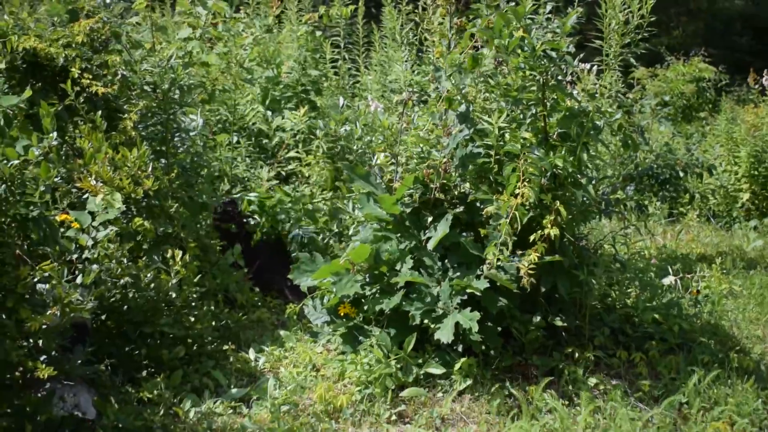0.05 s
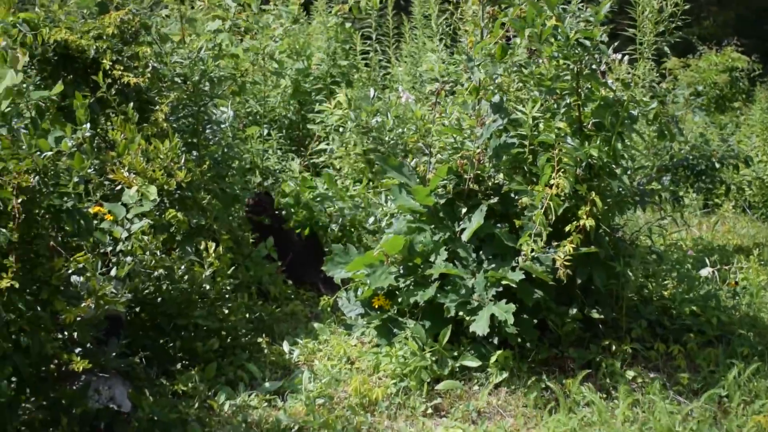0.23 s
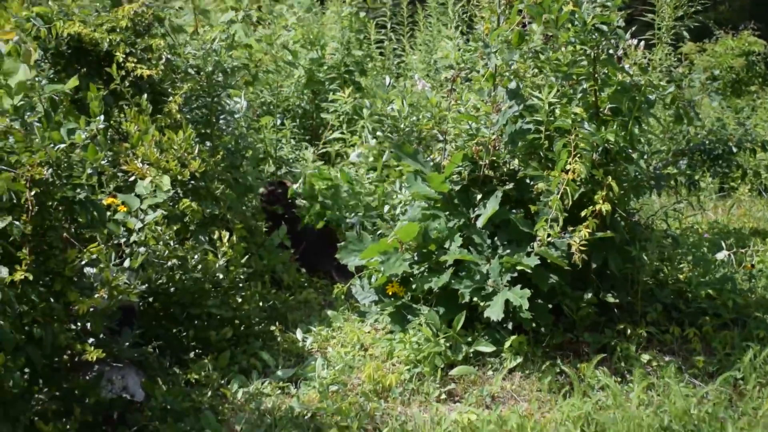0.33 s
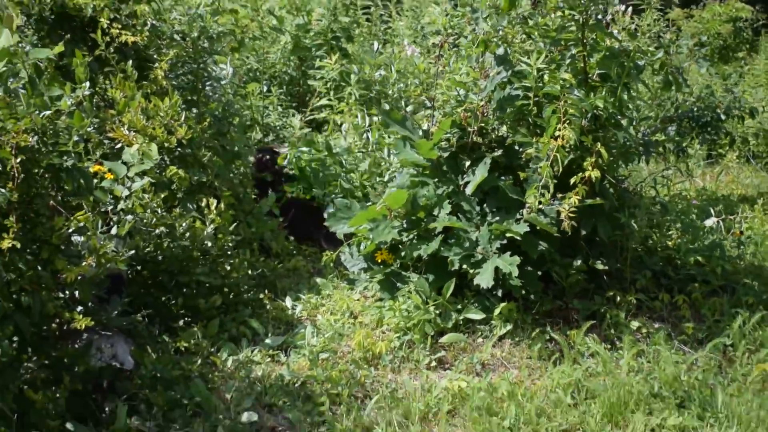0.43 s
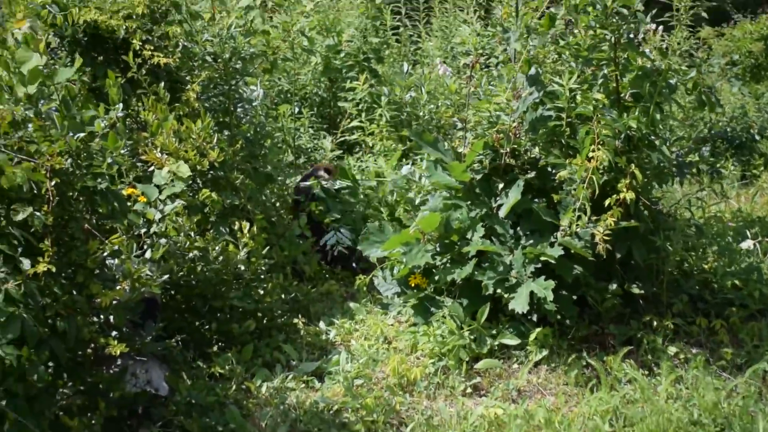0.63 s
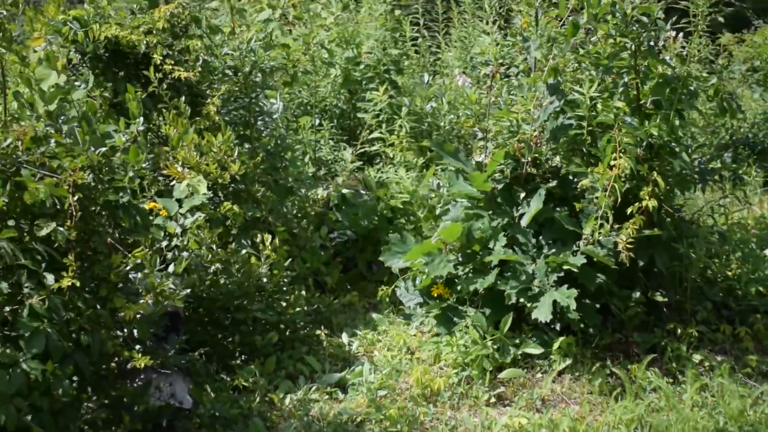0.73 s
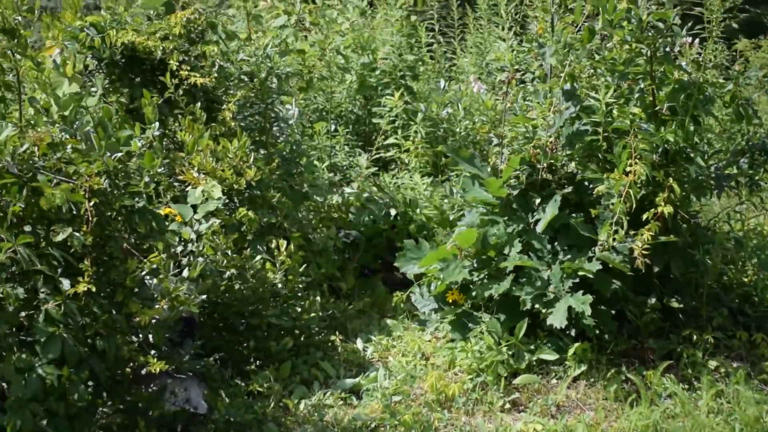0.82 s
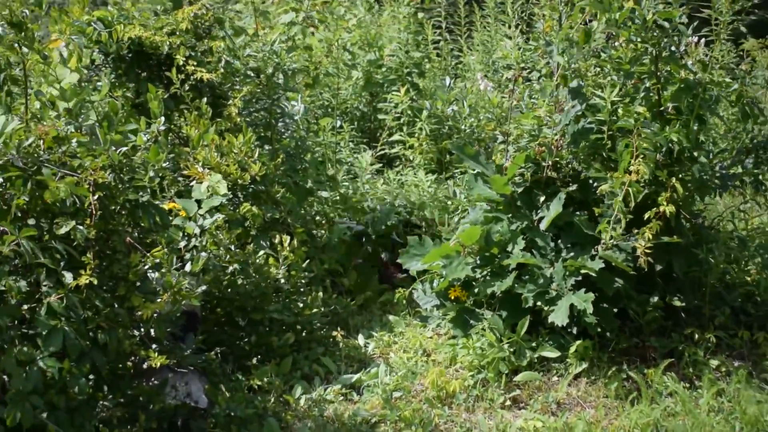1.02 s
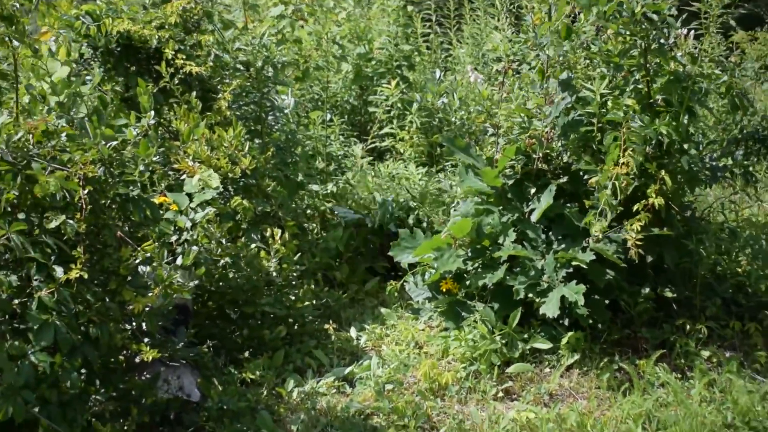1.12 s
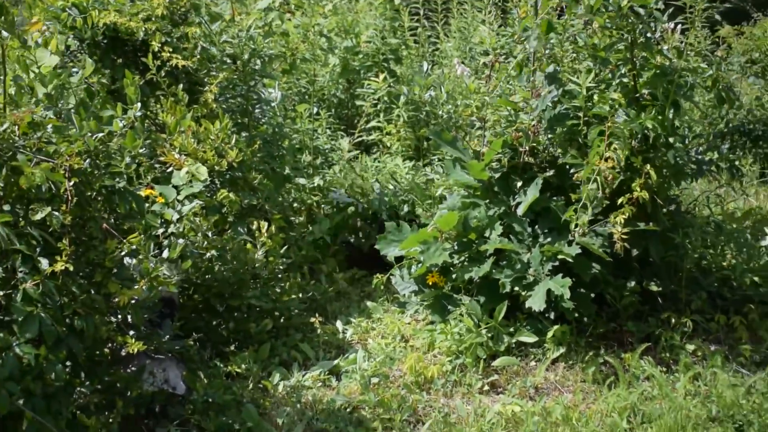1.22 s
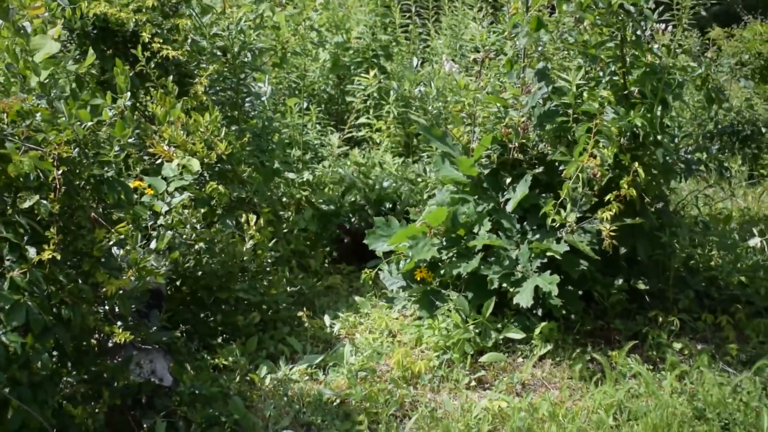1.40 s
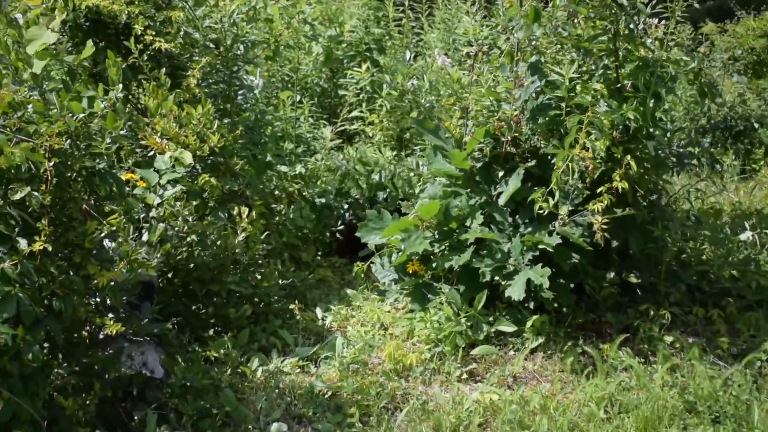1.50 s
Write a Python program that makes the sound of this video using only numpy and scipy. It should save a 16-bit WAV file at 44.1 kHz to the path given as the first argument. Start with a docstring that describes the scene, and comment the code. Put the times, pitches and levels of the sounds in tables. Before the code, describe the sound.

Two uneven gusts of wind rumble and thump on the microphone in a leafy outdoor spot. Soft rustling builds underneath, with faint high insect trills, one tiny click in the first gust and a thin whistle in the second.

```python
"""A faint hum and soft outdoor noise come first; almost at once, wind buffets the microphone.
Two gusts rumble and flutter, and small swirls of air (eddies) add thumps and stray puffs.
Nearby shrubs hiss more as the breeze builds, and an insect trills on one high note.
Something small clicks close by in the first gust; a thin whistle rises and falls with the second."""
import sys
import numpy as np
from scipy import signal
from scipy.fft import rfft, irfft, next_fast_len
from scipy.io import wavfile
from scipy.ndimage import uniform_filter1d, map_coordinates

SR = 44100
rng = np.random.default_rng(int(sys.argv[2]) if len(sys.argv) > 2 else 0)


def transcribe(u):
    """Save the signal u as a 16-bit wav file named by the first command-line argument.

    u: samples, shape (n,) or (channels, n), limited to [-1, 1]; the rate is SR.
    q: integer samples, one column per channel.
    """
    v = np.clip(np.atleast_2d(u).T, -1, 1)
    q = np.round(v * 32767).astype(np.int16)
    wavfile.write(sys.argv[1], SR, q)


N = 68355

# tone colour of the distant noise (frequency [Hz], relative level [dB])
AIR_SPECTRUM = [(15, 4), (35, 4), (100, -10.5), (250, -5), (500, -13.5), (1000, -19), (3000, -41)]
# wind at the microphone (time [s], level [dB])
WIND_LEVELS = [(0, -58), (.14, -55), (.205, -30.5), (.29, -24), (.33, -27), (.39, -29.5), (.455, -21.5),
               (.51, -29.5), (.59, -45.5), (.69, -45), (.75, -43), (.96, -47), (1.005, -26), (1.12, -27),
               (1.2, -35.5), (1.34, -43.5), (1.38, -59.5), (1.55, -61.5)]
# the wind's deep rumble and its faster flutter (frequency [Hz], relative level [dB])
RUMBLE_SPECTRUM = [(12, -13), (28, -12), (50, 1.5), (80, 0.5), (130, -6), (200, -11), (300, -26),
                   (600, -39), (1500, -100)]
FLUTTER_SPECTRUM = [(40, -4), (120, -0.5), (210, -1), (300, -7.5), (420, -22.5), (600, -26), (900, -44),
                    (2000, -90)]
# leaves in the breeze (time [s], rush level [dB], sizzle level [dB])
LEAF_LEVELS = [(0, -60.5, -73.5), (.25, -56, -67), (.5, -53, -64), (.75, -54, -59), (.9, -51.5, -53.5),
               (1.02, -49, -54.5), (1.2, -51, -54.5), (1.4, -52.5, -52.5), (1.46, -55, -57.5),
               (1.55, -56.5, -57)]
# the leaves' broad rush and their fine, high sizzle (frequency [Hz], relative level [dB])
RUSH_SPECTRUM = [(100, -28.5), (400, 3.5), (800, 0.5), (1300, -0.5), (2000, -2), (3000, -3.5), (4000, -5.5),
                 (5200, -8.5), (8000, -16), (15000, -38)]
SIZZLE_SPECTRUM = [(1500, -14), (4000, -1), (6500, -1), (10000, -1), (12500, -7.5), (15500, -15)]
# leaves brushing together (time [s], level [dB], half-length [s], centre frequency [Hz])
LEAF_RUSTLES = [(0.463, -57.5, 0.016, 4600), (0.483, -52, 0.0024, 5400), (.561, -53, 0.0015, 5800),
                (0.593, -54, .02, 4400), (0.611, -46.5, 0.002, 4900), (0.977, -59, 0.0066, 12000),
                (1.345, -46.5, 0.0026, 9100), (1.429, -52, 0.011, 11700)]
# the insect's calls (start [s], length [s], level [dB])
INSECT_TRILLS = [(0.053, 0.095, -64.5), (.21, 0.11, -66.5), (0.352, 0.032, -58), (.51, 0.055, -61),
                 (0.813, 0.15, -64), (0.958, 0.14, -62.5)]
# eddies hitting the microphone (time [s], level [dB], pitch [Hz])
EDDY_THUMPS = [(0.201, -22.5, 121), (0.225, -22, 208), (.247, -19.5, 166), (0.288, -15, 71),
               (.295, -18, 166), (.366, -21, 168), (0.411, -20, 106), (0.4334, -13, 208),
               (0.45, -17.5, 157), (.46, -9.5, 143), (.474, -18.5, 187), (.636, -20.5, 99.4),
               (0.699, -37, 89), (0.776, -22, 133), (0.807, -21, 70.5), (.893, -19.5, 94),
               (.998, -17.5, 171), (1.01, -10.5, 71), (1.042, -18, 142), (1.071, -14, 169),
               (1.089, -14, 162), (1.108, -10.5, 103), (1.128, -15, 148), (1.237, -15, 129.6),
               (1.504, -40.5, 85)]
# tones ringing in the click (frequency [Hz], relative level [dB], time to fade by 60 dB [s])
CLICK_TONES = [(1950, -15, 0.015), (2540, -5.5, 0.0069), (3140, 4.5, 0.0036), (3800, 5.5, 0.0017),
               (7400, -25, 0.0033), (10400, -16, 0.0034)]
# filter that colours the click (frequency [Hz], gain [dB])
CLICK_FILTER = [(900, -34), (1450, -19), (1850, -2), (4300, -2), (5500, -10.5), (7500, -4), (15000, -7)]
# the whistle's lower tone (time [s], pitch [Hz], level [dB])
WHISTLE_PATH = [(.92, 3560, -78), (.97, 3660, -57), (1.03, 3830, -57), (1.08, 3950, -63), (1.15, 3900, -56),
                (1.2, 3800, -58), (1.25, 3620, -56), (1.29, 3500, -60.5), (1.33, 3400, -81)]


def amp(db):
    """Turn decibels into a number to multiply by."""
    return 10 ** (np.asarray(db) / 20)


def unit(x):
    """Scale x to an average strength (rms) of 1."""
    return x / np.sqrt(np.mean(x ** 2) + 1e-20)


def clock():
    """The time of every sample, in seconds."""
    return np.arange(N) / SR


def curves(rows):
    """Join a table's points with lines: one curve for each column after the time."""
    times, *columns = np.transpose(rows)
    return [np.interp(clock(), times, column) for column in columns]


def wobble(rate):
    """A smooth curve through `rate` random points a second."""
    return map_coordinates(rng.standard_normal(int(N * rate / SR) + 4), [clock() * rate])


def filtered(x, response):
    """Multiply each frequency in x by the gain that `response` gives it."""
    size = next_fast_len(N + SR // 2)
    gains = response(np.fft.rfftfreq(size, 1 / SR))
    return irfft(rfft(x, size) * gains, size)[:N]


def shaped(x, spectrum):
    """Filter x along a curve of (frequency [Hz], gain [dB]) points."""
    points_hz, db = np.transpose(spectrum)
    return filtered(x, lambda hz: amp(np.interp(np.log(hz + 1), np.log(points_hz), db)))


def coloured(x, spectrum):
    """Give x a tone colour, at strength 1."""
    return unit(shaped(x, spectrum))


def tone(hz, waver):
    """A pure tone of strength 1 whose pitch wavers a little."""
    unsteady_hz = hz * (1 + waver * wobble(120))
    return np.sqrt(2) * np.sin(2 * np.pi * np.cumsum(unsteady_hz) / SR)


def background():
    """Distant outdoor noise with a low hum."""
    air = amp(-53.5) * coloured(rng.standard_normal(N), AIR_SPECTRUM)
    return air + amp(-54) * tone(hz=126.1, waver=0.031)


def turbulence(spectrum, even_s):
    """Churning air: low noise, with swells longer than even_s seconds evened out."""
    noise = coloured(rng.standard_normal(N), spectrum)
    power = uniform_filter1d(np.abs(signal.hilbert(noise)) ** 2, max(int(even_s * SR), 1))
    return unit(noise / np.sqrt(np.abs(power) + 0.092))


def buffeting():
    """Wind rumbles on the microphone; the stronger it blows, the more it flutters."""
    wind_db, = curves(WIND_LEVELS)
    rumble = amp(wind_db) * turbulence(RUMBLE_SPECTRUM, even_s=0.0383)
    strong_wind_db, strong_flutter_db = -26.5, -38.5
    # the flutter grows 2 dB for every 1 dB of wind
    flutter_db = strong_flutter_db + 2 * (wind_db - strong_wind_db) + 1.5 * wobble(70)
    return rumble + amp(flutter_db) * turbulence(FLUTTER_SPECTRUM, even_s=0.023)


def crackle(grain_db):
    """Hiss broken into tiny grains, some louder than others."""
    return unit(rng.standard_normal(N) * amp(grain_db * wobble(900)))


def leaves():
    """The shrubs rush and sizzle in the breeze; now and then some leaves brush together."""
    rush_db, sizzle_db = curves(LEAF_LEVELS)
    out = amp(rush_db + 1.6 * wobble(24.9)) * coloured(crackle(grain_db=1.0), RUSH_SPECTRUM)
    out += amp(sizzle_db + 0.79 * wobble(29.9)) * coloured(crackle(grain_db=1.5), SIZZLE_SPECTRUM)
    for time, db, half_length, hz in LEAF_RUSTLES:
        rustle = coloured(crackle(grain_db=5.5), [(hz / 4, -30), (hz, 0), (hz * 3, -36)])
        swell = np.exp(-.5 * ((clock() - time) / half_length) ** 2)
        out += amp(db) * swell * rustle
    return out


def insect():
    """An insect gives short, soft trills on one high note."""
    level = np.zeros(N)
    for start, length, db in INSECT_TRILLS:
        progress = np.clip((clock() - start) / length, 0, 1)
        level += amp(db) * np.sqrt(np.abs(np.sin(np.pi * progress)))
    return level * tone(hz=4010, waver=0.002)


def eddies():
    """Each passing eddy is one short swing of pressure: fast ones are sharp, slow ones round."""
    reference_hz, reference_roundness = 149, 3.55
    out = np.zeros(N)
    for time, db, hz in EDDY_THUMPS:
        roundness = reference_roundness * (reference_hz / hz) ** 0.94
        swing = (1 - 2j * np.pi * hz * (clock() - time) / roundness) ** -(roundness + 1)
        turn = np.exp(2j * np.pi * rng.random())  # a push, a pull or some of each
        out += amp(db) * np.real(swing * turn)
    return out


def click():
    """Something small snaps and rings for a few milliseconds."""
    start_s, attack_s = 0.3691, 0.00016
    age = np.maximum(clock() - start_s, 0)
    ring = sum(amp(db - 60 * age / fade_s) * np.sin(2 * np.pi * hz * age)
               for hz, db, fade_s in CLICK_TONES)
    fade_in = 1 - np.exp(-age / attack_s)
    return amp(-20) * shaped(ring * fade_in, CLICK_FILTER)


def whistle():
    """A faint, airy whistle of two tones rises and falls with the second gust."""
    hz, db = curves(WHISTLE_PATH)
    width_hz = 110  # quick flicker smears each tone, making it breathy
    out = np.zeros(N)
    for pitch_ratio, offset_db in [(1, 0), (1.2, -7)]:
        flicker = 1 + wobble(width_hz) + 1j * wobble(width_hz)
        pure_tone = np.exp(2j * np.pi * np.cumsum(hz * pitch_ratio) / SR)
        out += amp(db + offset_db) * unit(np.real(flicker * pure_tone))
    return out


def scene():
    """All the sounds add up at one microphone."""
    return (background() + buffeting() + leaves() + insect() + eddies() + click() + whistle())[None]


def record(dry):
    """The camera keeps nothing above its highest frequency."""
    top_hz = 15700
    return np.array([filtered(x, lambda hz: hz < top_hz) for x in dry])


dry = scene()
out = record(dry)
transcribe(out)
```